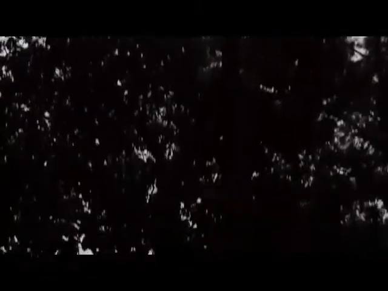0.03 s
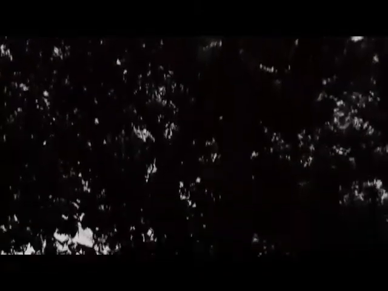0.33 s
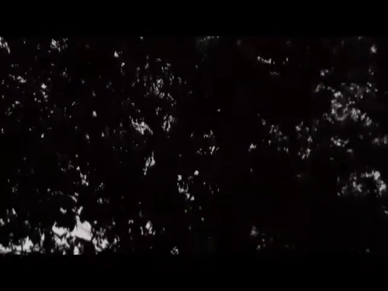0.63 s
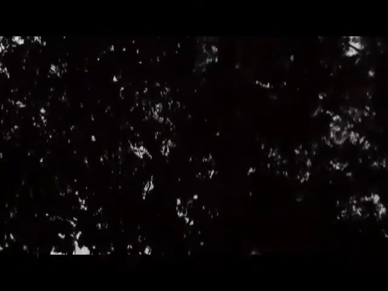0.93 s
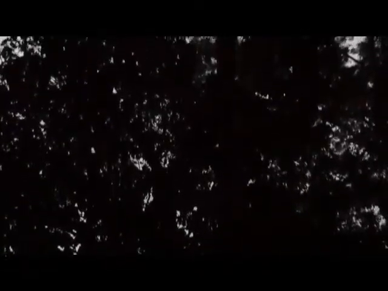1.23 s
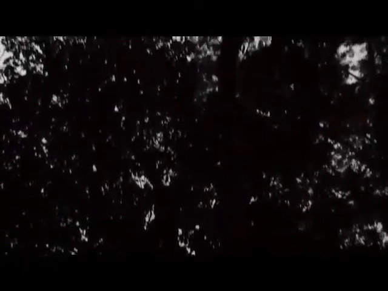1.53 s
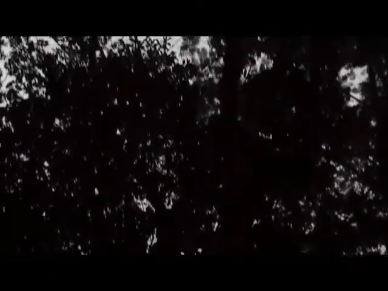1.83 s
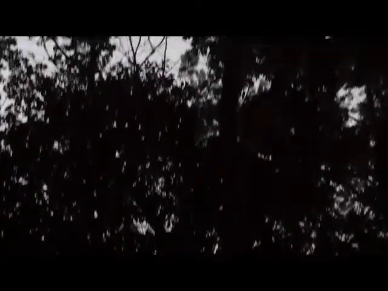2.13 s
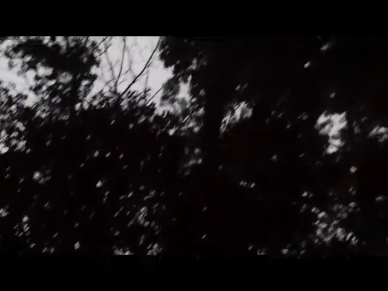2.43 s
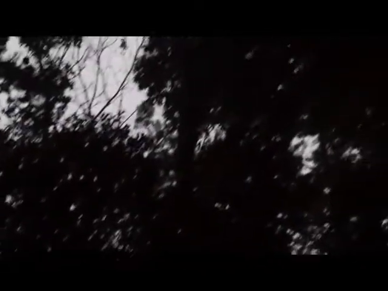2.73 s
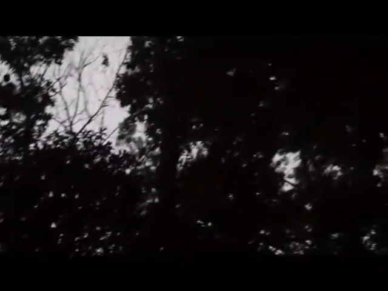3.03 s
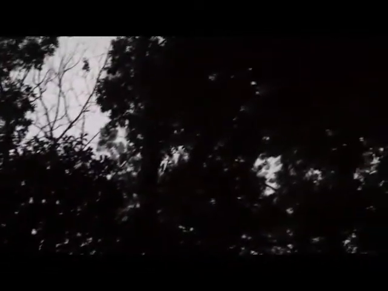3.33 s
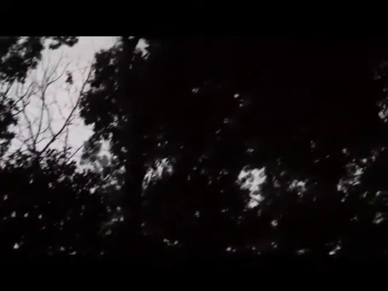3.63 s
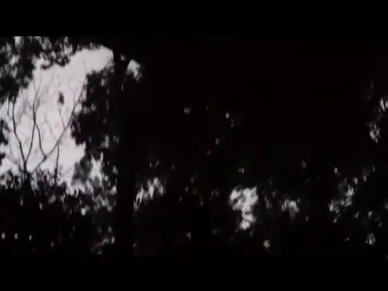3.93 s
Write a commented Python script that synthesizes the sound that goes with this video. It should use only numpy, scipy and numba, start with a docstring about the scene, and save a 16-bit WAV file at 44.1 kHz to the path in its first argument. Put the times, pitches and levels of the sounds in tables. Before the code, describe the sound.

A howler monkey roars loudly from the start, rough and throbbing, with rasp and short squeals on top. The pitch sinks to a low grunt at about 1.3 seconds, echoing briefly through the trees. A few light leaf ticks fall between 1.8 and 3.3 seconds. Faint hoots come near 2.2, 2.9 and 3.6 seconds. Cicadas, a cricket and soft forest hush continue throughout; a thin insect whine joins around 3.5.

```python
"""A howler monkey ends a long roar in the canopy: ragged vocal pulses sink in pitch and ring its throat,
sac and mouth, with a rasp of air and short falling squeals on top. It closes on a low grunt, and the
trees carry the sound away. A few ticks in the leaves and three faint hoots follow, and a thin insect
whine joins near the end. Cicadas, a cricket and far rustling go on throughout, over the dawn hush."""
import sys
import numpy as np
from scipy import signal
from scipy.fft import rfft, irfft
from scipy.io import wavfile
from scipy.ndimage import uniform_filter1d, minimum_filter1d, map_coordinates
from numba import njit

SR = 44100
rng = np.random.default_rng(int(sys.argv[2]) if len(sys.argv) > 2 else 0)


def log_audio(samples):
    """Write samples as a 16-bit WAV file to the path given in sys.argv[1]."""
    # one column per channel
    frames = np.atleast_2d(samples).T
    # limit to full scale, then quantise
    limited = np.clip(frames, -1, 1)
    pcm = np.round(limited * 32767).astype(np.int16)
    wavfile.write(sys.argv[1], SR, pcm)


N = 176400
TIME = np.arange(N) / SR
SIDE = np.array([[1], [-1]])  # adds to the left, subtracts from the right

# the sinking line of the vocal folds: time_s, pitch_hz, roughness (0-1)
FOLD_PITCH = [(0, 340.1, 0.83), (.14, 325.4, 0.77), (.21, 313.4, 0.42), (.29, 299.4, 0.59),
              (.4, 272.6, 0.79), (.56, 235.2, .7), (.73, 248.4, 0.88), (.79, 267.5, 0.32), (.86, 250, 0.42),
              (.9, 218.4, 0.55), (1.03, 212.6, .6), (1.18, 188.3, 0.81), (1.255, 176.1, 0.32),
              (1.35, 166.2, .33), (1.5, 154.8, 0.36)]
# swells of the throat sac: start_s, length_s, pitch_hz, glide_hz_per_s, level_db
SAC_BOOMS = [(-.02, 0.1, 446, 2, -12.5), (0.065, 0.064, 431.4, -200, -11), (0.091, 0.042, 548, 9, -13),
             (0.195, 0.061, 563, -4, -18.5), (0.293, .06, 548, -700, -11.5),
             (0.359, 0.075, 427.5, 399, -13.5), (0.463, .05, 502, -300, -15.5),
             (0.494, 0.051, 442.4, 2.5, -13.5), (0.563, 0.0744, 426, -100, -12),
             (0.693, .065, 428, -200, -10.5), (0.771, 0.065, 548, -4.5, -15),
             (0.865, 0.069, 434.7, -500, -20), (.913, 0.053, 557.6, -400, -16.5)]


def roar():
    """The throbbing folds drive throat, mouth and sac, harder on each boom; rasp and squeals ride on top."""
    # contour of the roar: time_s, level_db
    effort_curve = [(0, -18), (.2, -19), (.27, -23.5), (.34, -24.5), (.44, -21.5), (.5, -20), (.545, -23.5),
                    (.59, -21.5), (.67, -19), (.73, -22), (.82, -22.5), (1.04, -23.5), (1.18, -26),
                    (1.235, -33.5), (1.3, -36.5), (1.42, -46), (1.52, -56)]
    push_db, low_cut_hz = 1.5, 173
    voice, air, cycles = vocal_folds()
    flap = throb()
    push = sum(gate(start, length, length / 2) for start, length, *_ in SAC_BOOMS)
    effort = fading(effort_curve) * flap * undb(push_db * push)
    body = (throat(voice) + mouth(voice + .5 * air)) * effort
    chest = throat_sac(voice + air) * effort + booms()
    buzz = air + .5 * voice + 1.2 * overtones()
    tones = clean_voice(cycles) + grunt(cycles)
    edge = flicker(rasp(buzz) + teeth_hiss(buzz)) * np.sqrt(flap) + squeals()
    call = chest + tones + pan(body, db=-1) + pan(edge, db=-2)
    return signal.sosfilt(signal.butter(4, low_cut_hz, "high", fs=SR, output="sos"), call)


def vocal_folds():
    """Uneven pulses, each with a puff of air. Gives the voice, the air alone and a smooth cycle count."""
    jitter, shimmer_db = .14, 1
    hz, rough = curve(FOLD_PITCH), curve(FOLD_PITCH, column=2)
    cycles = np.cumsum(hz * np.exp(jitter * rough * walk(220))) / SR
    pulses = np.zeros(N)
    pulses[np.flatnonzero(np.diff(np.floor(cycles)) > 0)] = 1
    size = undb(shimmer_db * rough * walk(110))
    air = unit(np.exp(-(cycles % 1) / 0.7) * rng.standard_normal(N))
    smooth_cycles = np.cumsum(hz * (1 + 0.0053 * walk(48.8))) / SR
    return unit(size * (unit(pulses) + rough * air)), unit(size * air), smooth_cycles


def throb():
    """The loose throat flaps unevenly and chokes the flow briefly once a cycle."""
    rate_hz, scatter, choke_db = 22, .18, -6
    cycles = np.cumsum(rate_hz * (1 + scatter * walk(11.95))) / SR
    return unit(undb(choke_db * np.sin(np.pi * cycles) ** 4))


def throat(voice):
    """The throat's steady resonances give the roar its body."""
    # throat resonances: centre_hz, width_hz, relative_db
    resonances = [(339.6, 169, -5.5), (484, 93, 0.5), (722, 210, -2.5), (822, 260, -3), (1092, 147, -7),
                  (1244, 155, -12.5), (1400, 85, -11.5), (1498, 94, -11.5)]
    return resonate(voice, resonances) * undb(-1.5)


def mouth(voice):
    """One moving, saturated resonance gives the roar its vowel."""
    # path of the mouth resonance: time_s, centre_hz
    vowel = [(0, 980), (.07, 922), (.2, 963), (.28, 1010), (.34, 1055), (.4, 880), (.48, 964), (.53, 850),
             (.61, 880), (.7, 955), (.82, 902), (.93, 932), (1.2, 880), (1.29, 1012), (1.4, 895)]
    return saturate(formant(voice, curve(vowel), width_hz=121)) * undb(-3)


def throat_sac(voice):
    """Two saturated resonances shift together as the sac tightens and slackens."""
    # sac resonances: centre_hz, width_hz, level_db
    resonances = [(413.8, 95, -8), (538.6, 97.3, -2)]
    # stretch of the sac: time_s, tuning_shift_percent
    stretch = [(0, -4), (.12, -0.5), (.24, 6), (.4, 0.5), (.51, -4), (.63, 4), (.74, -5), (.95, 4),
               (1.13, -5), (1.19, 3.5), (1.35, 1)]
    tuning = 1 + curve(stretch) / 100
    return sum(saturate(formant(voice, hz * tuning, width)) * undb(db) for hz, width, db in resonances)


def booms():
    """The sac swells briefly into nearly pure tones that glide and waver."""
    out = 0
    for start, length, hz, glide, db in SAC_BOOMS:
        bend = glide * (np.clip(TIME - start, 0, length) - length / 2)
        pitch = hz * (1 + 0.0148 * walk(90.7)) + bend
        out += sine(pitch) * gate(start, length, min(length / 2, .035)) * undb(db)
    return out


def clean_voice(cycles):
    """In places the fundamental and its octave ring clean through the roar."""
    # clean stretches: start_s, length_s, level_db
    stretches = [(0.164, 0.11, -19.5), (0.487, 0.11, -31), (0.757, 0.12, -28.5), (0.868, 0.088, -32),
                 (0.979, 0.071, -33.5)]
    octave_db, fade_db_per_s = -2.5, 20
    tone = np.sin(2 * np.pi * cycles) + undb(octave_db) * np.sin(4 * np.pi * cycles)
    envelope = sum(undb(db - fade_db_per_s * (TIME - start)) * gate(start, length, edge_s=.03)
                   for start, length, db in stretches)
    return np.sqrt(2) * tone * envelope


def overtones():
    """The steadier part of the folds' buzz, which streaks the rasp with overtones."""
    cycles = np.cumsum(curve(FOLD_PITCH) * (1 + .011 * walk(60))) / SR
    return unit(np.diff(np.floor(cycles), prepend=0))


def rasp(buzz):
    """Air and buzz rasp in three bands, each on its own fader."""
    # resonances of the low and middle bands: centre_hz, width_hz, relative_db
    low_band = [(1975, 216, 0)]
    middle_band = [(2690, 300, -4), (3330, 340, 0), (3660, 340, -2), (6400, 900, -18)]
    # their faders, ahead of the trims: time_s, low_db, middle_db
    faders = [(0.0, -31, -33), (0.036, -36, -37), (0.064, -30, -32), (0.116, -50, -34), (0.21, -32, -35),
              (0.254, -46, -38.5), (0.31, -29.5, -29.5), (0.452, -46, -33.5), (0.48, -38, -29.5),
              (.58, -34.5, -34), (0.766, -39, -37.5), (0.822, -26, -37), (0.924, -67, -45.5),
              (1.45, -51.5, -56)]
    # fader of the top band: time_s, level_db
    top_fader = [(0, -42), (.33, -42.5), (.45, -51), (.6, -46), (1, -45), (1.19, -57), (1.3, -68)]
    low = resonate(buzz, low_band) * fading(faders) * undb(-4.5)
    middle = resonate(buzz, middle_band) * fading(faders, column=2) * undb(-3)
    top = band(buzz, hz=5135, width_hz=530) * fading(top_fader)
    return low + middle + top


def teeth_hiss(buzz):
    """Air hisses past the teeth in one moving band."""
    # path of the hiss: time_s, centre_hz, relative_db
    path = [(0, 4000, -36.5), (.12, 4000, -35), (.21, 4350, -34), (.27, 4100, -39), (.32, 4200, -40.5),
            (.43, 4070, -46), (.5, 3747, -32), (.57, 4020, -43), (.69, 4200, -40), (.76, 4250, -32),
            (.82, 4460, -36), (.9, 4270, -38), (.99, 4440, -40), (1.16, 4540, -41.5), (1.24, 4350, -52),
            (1.35, 4030, -59)]
    return formant(buzz, curve(path), width_hz=765) * fading(path, column=2) * undb(-1)


def flicker(x):
    """Narrow bands of the rasp flicker in level, each on its own."""
    depth_db, rate_hz = 2.5, 22
    spectrum, f = rfft(x), np.fft.rfftfreq(N, 1 / SR)
    centres = np.arange(1500, 6001, 300)
    strips = (irfft(spectrum * np.interp(f, centres, centres == hz), N) for hz in centres)
    return sum(strip * unit(undb(depth_db * walk(rate_hz))) for strip in strips)


def squeals():
    """The folds briefly ring with clear, sagging overtones, heard through one bright resonance."""
    # squeals: start_s, length_s, pitch_hz, bright_centre_hz, width_hz, level_db
    cries = [(0.019, 0.097, 431, 2220, 286, -29), (0.178, 0.049, 328.6, 2100, 300, -27),
             (0.284, 0.077, 346, 3480, 900, -32), (0.447, 0.11, 469.4, 2730, 1040, -30.5),
             (0.757, 0.094, 259.5, 2022, 330, -40)]
    sag_per_s, waver = 0.648, 0.0072
    out = np.zeros(N)
    for start, length, hz, centre, width, db in cries:
        window = gate(start, length, edge_s=0.039)
        on = window > 0
        pitch = hz * np.exp(-sag_per_s * TIME[:on.sum()] + waver * walk(150)[on])
        phase = 2 * np.pi * np.cumsum(pitch) / SR
        stack = 0
        for k in range(3, 13):
            off_centre = 2 * (k * pitch - centre) / width
            stack += np.sin(k * phase + rng.uniform(0, 2 * np.pi)) / (1 + off_centre ** 4)
        out[on] += unit(stack) * window[on] * undb(db)
    return out


def grunt(cycles):
    """The roar closes on a low voiced grunt that swells and sinks away."""
    # harmonics from the fundamental up: level_db
    harmonics = (-39.5, -42, -36, -45.5, -49, -46)
    start_s, attack_s, fade_after_s, fade_db_per_s, rough_db = 1.22, 0.043, 0.11, 98, 3
    age = TIME - start_s
    envelope = np.clip(age / attack_s, 0, 1) * undb(-fade_db_per_s * np.maximum(age - fade_after_s, 0))
    tone = sum(undb(db + rough_db * walk(70)) * np.sin(2 * np.pi * k * cycles)
               for k, db in enumerate(harmonics, 1))
    return np.sqrt(2) * envelope * tone


def hoots():
    """Each faint hoot scoops up to its pitch and swells; rougher ones do so less and waver more."""
    # hoots: start_s, length_s, pitch_hz, level_db, roughness (0-1)
    calls = [(2.212, .47, 468.6, -42.5, 0.18), (2.922, 0.45, 473.7, -42, 0.35),
             (3.579, 0.94, 459.7, -44, 0.67)]
    scoop, scoop_s, swell_db, waver = 0.073, 0.1384, 9.5, 0.057
    out = 0
    for start, length, hz, db, rough in calls:
        age = np.maximum(TIME - start, 0)
        pitch = hz * (1 - scoop * (1 - rough) * np.exp(-age / scoop_s) + waver * rough * walk(70))
        swell = swell_db * (1 - rough) * (np.minimum(age / length, 1) - 1)
        tremble = 6 * rough * walk(55)
        out += sine(pitch) * undb(db + swell + tremble) * gate(start, length, edge_s=.03)
    return out


def leaf_ticks():
    """Drips or twigs: short bursts of noise in the leaves."""
    # ticks: start_s, level_db, centre_hz, width_hz, decay_s
    hits = [(1.775, -48.5, 1503, 1073, 0.051), (2.239, -49.5, 1450, 1300, 0.049),
            (2.586, -46.5, 3470, 1400, 0.024), (3.327, -37, 4450, 1260, 0.0081)]
    attack_s = 0.0011
    out = 0
    for start, db, hz, width, decay in hits:
        age = np.maximum(TIME - start, 0)
        out += noise_band(hz, width) * undb(db) * np.minimum(age / attack_s, 1) * np.exp(-age / decay)
    return out


def cicadas():
    """Many cicadas blend into fluttering, slowly swelling bands of hiss; the faint lowest band is a cricket's
    higher note."""
    # chorus bands: centre_hz, width_hz, level_db, left_minus_right_db
    chorus = [(2855, 99, -60, 3.5), (6142, 170, -49.5, 4), (6446, 316, -48, -2.5), (7290, 130, -60.5, 11),
              (9240, 1780, -42, -0.5), (10290, 1430, -44.5, 1)]
    spread, flutter_db, swell_db = 0.29, 0.28, 1.4
    out = 0
    for hz, width, db, pan_db in chorus:
        hiss = noise_band(hz, width) + spread * noise_band(hz, width) * SIDE
        level = undb(db + flutter_db * walk(60) - swell_db * walk(2.76))
        out += pan(hiss * level, pan_db)
    return out


def cricket():
    """A cricket holds one quivering note: noise rung twice through a narrow resonance."""
    # the cricket's fader: time_s, level_db
    fader = [(0, -37.5), (1.5, -53), (2.2, -54), (3.43, -55), (3.63, -46), (4, -48.5)]
    pitch_hz, width_hz = 2170, 38.6
    b, a = signal.iirpeak(pitch_hz, pitch_hz / width_hz / np.sqrt(2), fs=SR)
    mid, side = (unit(signal.lfilter(b, a, signal.lfilter(b, a, noise)))
                 for noise in rng.standard_normal((2, N)))
    return (mid + 0.5 * side * SIDE) * undb(curve(fader))


def far_rustle():
    """Leaves rustle unevenly far away."""
    # rustle bands: centre_hz, width_hz, level_db
    bands = [(3080, 1100, -73), (3130, 330, -73), (3930, 860, -69), (4450, 250, -89)]
    swell_db = 4
    return sum(noise_band(hz, width) * undb(db + swell_db * walk(11)) for hz, width, db in bands)


def insect_whine():
    """A thin insect whine comes in near the end."""
    # whine bands: centre_hz, width_hz, level_db
    bands = [(4540, 190, -64), (4780, 160, -74), (5330, 140, -72)]
    whine = sum(noise_band(hz, width) * undb(db) for hz, width, db in bands)
    return whine * gate(start_s=3.52, length_s=0.51, edge_s=0.11)


def forest_reverb(x):
    """Near trunks and leaves scatter the sound into a soft tail; the far forest adds a long, hollow one."""
    # colour of the far tail: centre_hz, width_hz, relative_db
    hollow = [(545, 290, 0), (900, 250, -9)]
    predelay_s, attack_s = 0.013, 0.0045
    age = np.maximum(TIME - predelay_s, 0)
    far = np.array([resonate(channel, hollow) for channel in diffuse_noise()])
    response = 0
    for noise, t60_s, db in ((diffuse_noise(), 0.83, -6), (far, 1.75, -25.5)):
        tail = noise * np.minimum(age / attack_s, 1) * undb(-60 * age / t60_s)
        response += undb(db) * tail / np.sqrt(np.sum(tail ** 2) / 2)
    return x + signal.fftconvolve(x, response, axes=1)[:, :N]


def dawn_hush():
    """The forest's steady bed of soft, dark noise."""
    # tone of the hush: frequency_hz, relative_db
    spectrum = [(25, -10), (60, -13), (120, -3), (220, 0.5), (400, 7), (560, 5.5), (850, 1), (1200, -5),
                (1700, -8), (2600, -7.5), (3600, -13.5), (4700, -14), (5500, -34), (12000, -55)]
    return unit(np.array([colour(channel, spectrum) for channel in diffuse_noise()])) * undb(-47)


def diffuse_noise():
    """Stereo noise, narrow in the bass and wider in the treble."""
    # stereo width: frequency_hz, side_minus_mid_db
    spread = [(120, -27), (280, -39), (520, -18), (1000, -3.5), (4000, -5.5)]
    return rng.standard_normal(N) + colour(rng.standard_normal(N), spread) * SIDE


def undb(db):
    """Decibels to gain."""
    return 10 ** (np.asarray(db) / 20)


def unit(x):
    """Scale to rms 1."""
    return x / np.sqrt(np.mean(x ** 2))


def curve(table, column=1):
    """One column of a table, joined by straight lines in time."""
    rows = np.array(table, float)
    return np.interp(TIME, rows[:, 0], rows[:, column])


def fading(table, column=1):
    """Smoothed gain from a level curve that dies away after its last point."""
    fade_db_per_s, slew_s = 80, 0.0054
    db = curve(table, column) - fade_db_per_s * np.maximum(TIME - table[-1][0], 0)
    return uniform_filter1d(undb(db), int(slew_s * SR))


def gate(start_s, length_s, edge_s):
    """Smooth attack, hold and release."""
    age = TIME - start_s
    return np.sin(np.pi / 2 * np.clip(np.minimum(age, length_s - age) / edge_s, 0, 1)) ** 2


def walk(rate_hz):
    """Smooth random motion with a spread of 1."""
    steps = rng.standard_normal(4096)
    return unit(map_coordinates(steps, [TIME * rate_hz + 8], order=3, mode="mirror"))


def sine(pitch_hz):
    """A tone of rms 1 that follows a pitch curve."""
    return np.sqrt(2) * np.sin(2 * np.pi * np.cumsum(pitch_hz) / SR)


def resonate(x, table):
    """A bank of resonances whose powers add, scaled to rms 1."""
    f = np.fft.rfftfreq(N, 1 / SR) + 1
    power = sum(undb(db) ** 2 / (1 + ((f * f - hz * hz) / (f * width)) ** 2 / 2) ** 3
                for hz, width, db in table)
    return unit(irfft(rfft(x) * np.sqrt(power), N))


def band(x, hz, width_hz):
    """A single steady resonance."""
    return resonate(x, [(hz, width_hz, 0)])


def noise_band(hz, width_hz):
    """Noise through one resonance."""
    return band(rng.standard_normal(N), hz, width_hz)


@njit
def sweep(x, hz, width_hz):
    """A state-variable band-pass whose centre moves."""
    out, band_state, low_state = np.empty(len(x)), 0., 0.
    for i in range(len(x)):
        g, damping = np.tan(np.pi * hz[i] / SR), width_hz / hz[i]
        passed = (band_state + g * (x[i] - low_state)) / (1 + g * (g + damping))
        band_state = 2 * passed - band_state
        low_state += 2 * g * passed
        out[i] = damping * passed
    return out


def formant(x, hz, width_hz):
    """A moving resonance, applied three times for steep skirts."""
    for _ in range(3):
        x = sweep(x, hz, 2. * width_hz)
    return unit(x)


def saturate(x):
    """Softly limit the size of a swing, keeping its phase."""
    swing = signal.hilbert(unit(x))
    return unit(swing.real / np.hypot(abs(swing), .5))


def colour(x, points):
    """Equalise by (frequency_hz, gain_db) points."""
    hz, db = np.array(points, float).T
    f = np.fft.rfftfreq(len(x), 1 / SR) + 1
    return irfft(rfft(x) * undb(np.interp(np.log(f), np.log(hz), db)), len(x))


def pan(x, db):
    """Place a sound by its left minus right level."""
    return x * undb(SIDE * db / 2)


def scene():
    """The monkey among the trees, over insects and the hush of the forest."""
    hush = dawn_hush()
    canopy = forest_reverb(roar() + leaf_ticks())
    return canopy + hoots() + cicadas() + cricket() + far_rustle() + insect_whine() + hush


def record(dry):
    """A limiter eases down the highest peaks, and a steep low-pass cuts the top."""
    ceiling, top_hz, window = .9, 11600, SR // 100
    needed_gain = ceiling / np.maximum(abs(dry).max(axis=0), ceiling)
    gain = uniform_filter1d(minimum_filter1d(needed_gain, window), window)
    return signal.sosfilt(signal.ellip(10, .2, 80, top_hz, fs=SR, output="sos"), dry * gain)


dry = scene()
out = record(dry)
log_audio(out)
```